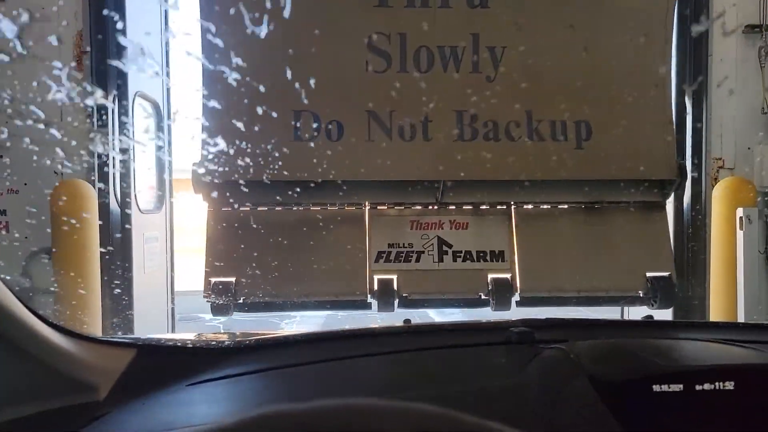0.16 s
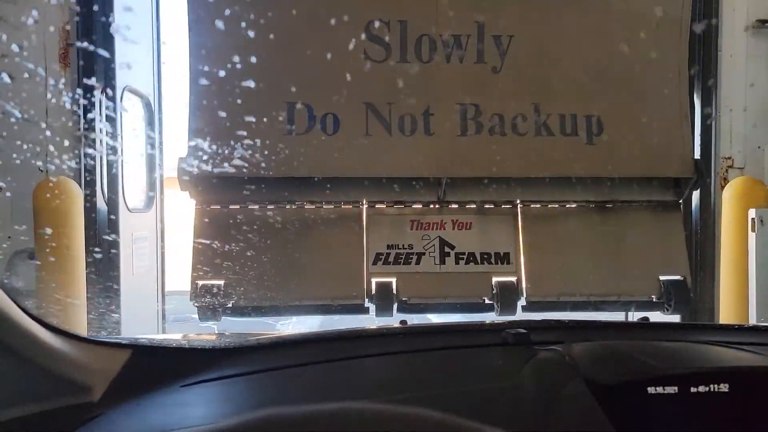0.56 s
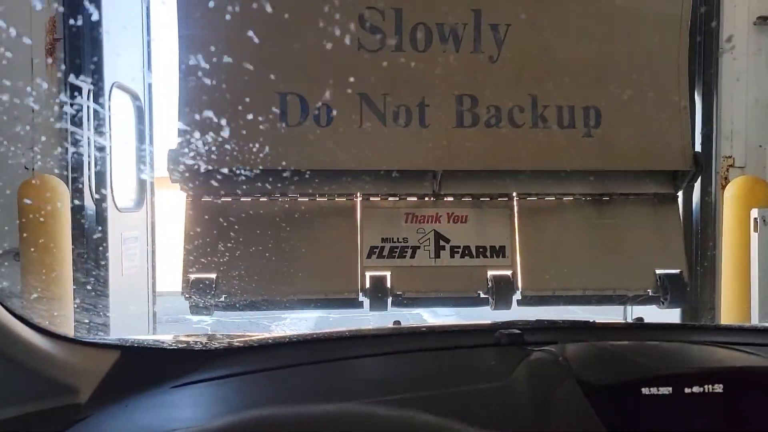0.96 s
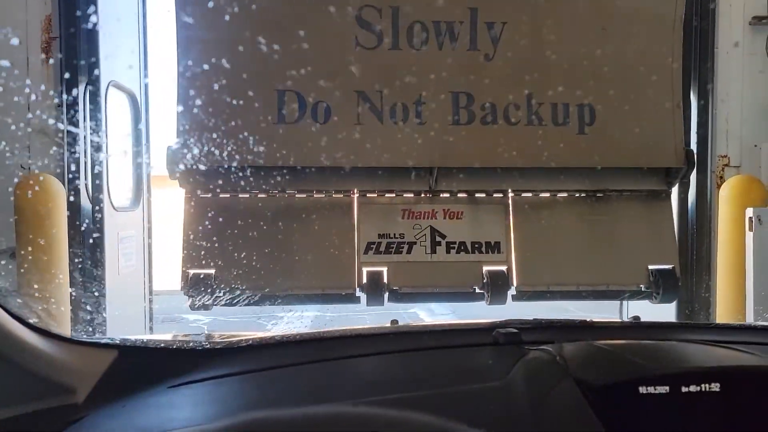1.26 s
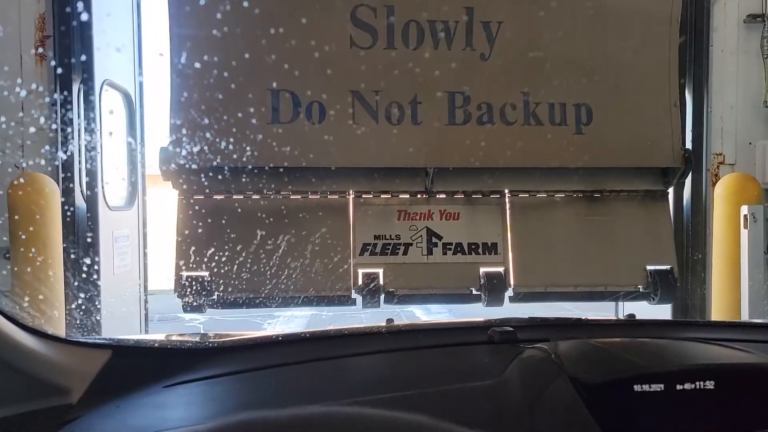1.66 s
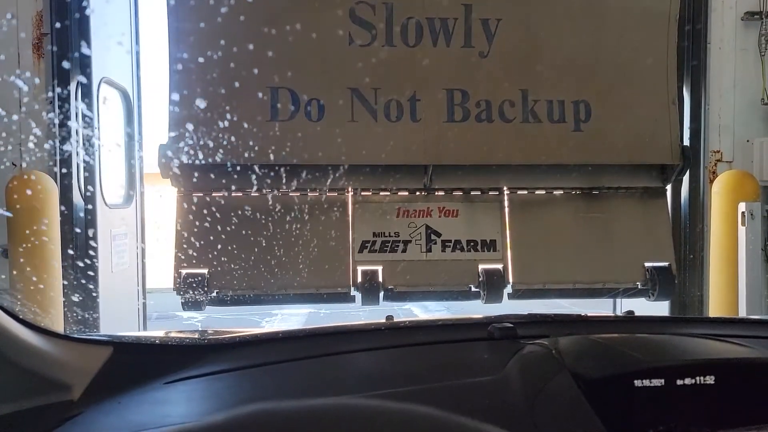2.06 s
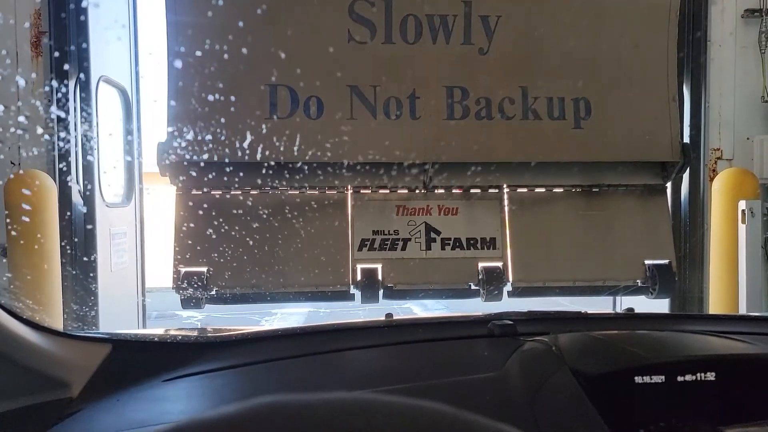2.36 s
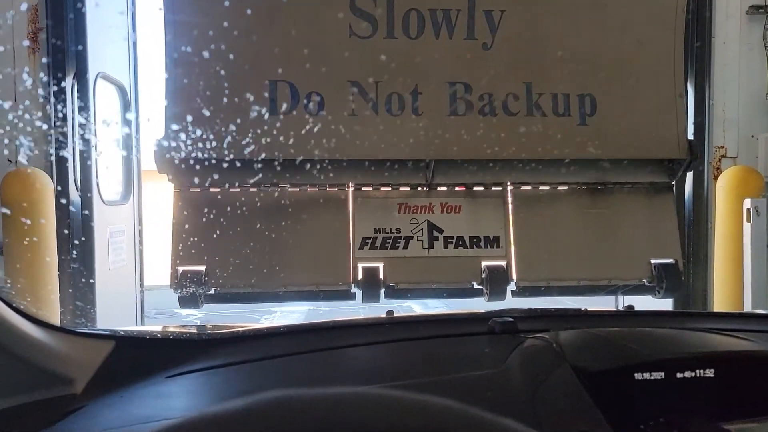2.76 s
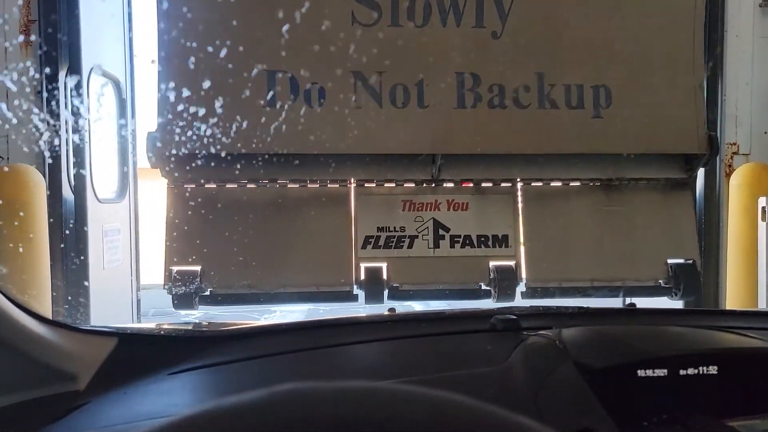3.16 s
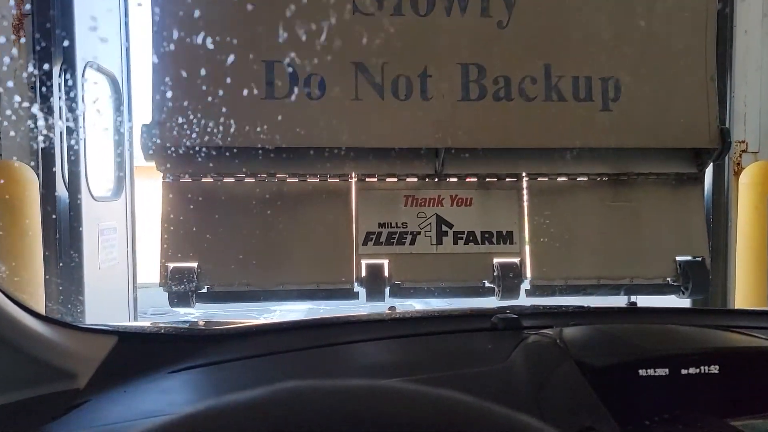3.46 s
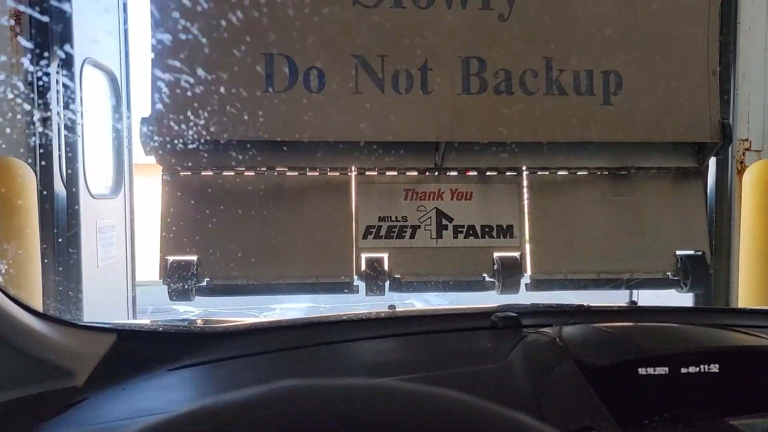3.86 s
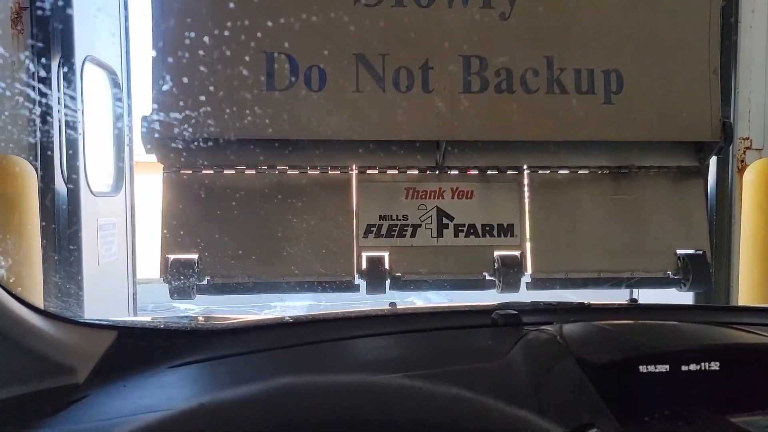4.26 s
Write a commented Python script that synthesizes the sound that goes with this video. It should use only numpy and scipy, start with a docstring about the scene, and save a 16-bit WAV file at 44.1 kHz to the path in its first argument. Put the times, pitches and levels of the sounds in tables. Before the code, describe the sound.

Inside a closed car under car wash dryer blowers, heavy low rumble fills the cabin from start to end, swelling and dipping rapidly as air buffets the roof and glass. A muffled roar flutters above it, with a faint fan hum coming and going. Soft hiss lies on top, and a few tiny ticks occur before one second. Close, enclosed stereo phone pickup.

```python
"""Air from the dryer blowers of a car wash buffets the roof and glass, heard inside the closed car.
Low noise in three groups of cabin and panel modes makes the boom; the body shell drones under it.
Fluttering bands of noise make the duller roar and hiss through body and seals. One fan hums as an
unsteady sine, a second as a narrow band of noise. A few bright ticks and a faint, flickering hiss
lie on top. All is heard by a phone with two microphone ports."""
import sys
import numpy as np
from scipy import signal
from scipy.fft import rfft, irfft
from scipy.io import wavfile
from scipy.ndimage import uniform_filter1d

SR = 44100
rng = np.random.default_rng(int(sys.argv[2]) if len(sys.argv) > 2 else 0)


def pcm_store(signal):
    """Save signal as 16-bit PCM."""
    levels = np.round(np.clip(np.atleast_2d(signal), -1, 1) * 32767)
    wavfile.write(sys.argv[1], SR, levels.astype(np.int16).T)


N = 194436
TIME = np.arange(N) / SR  # s
FREQ = np.maximum(np.fft.rfftfreq(N, 1 / SR), 1)  # Hz, kept above zero for logs and divisions

# level of the boom noise over time, before gusts: t/s, then level/dB of the lowest, middle and upper modes
BOOM_LEVELS = [(0.0, -19.5, -38, -32.5), (0.04, -25.5, -18.5, -24), (0.07, -21, -12.5, -18),
               (0.13, -19.5, -25.5, -33.5), (0.26, -25.5, -15, -15), (0.28, -39, -22.5, -29),
               (0.36, -23.5, -23, -17), (0.39, -19, -14.5, -24), (0.54, -16, -17.5, -19),
               (0.58, -14.5, -11.5, -25), (0.74, -14.5, -21, -24), (0.85, -28.5, -14, -19.5),
               (0.97, -24, -28, -31.5), (1.01, -17.5, -17.5, -16.5), (1.08, -30, -15.5, -30.5),
               (1.3, -28.5, -18, -22), (1.35, -12.5, -30, -27), (1.4, -11, -17, -19),
               (1.46, -24, -18.5, -24), (1.56, -24, -14, -22.5), (1.71, -24.5, -25, -21.5),
               (1.83, -15.5, -11, -22.5), (1.93, -38, -28, -22.5), (1.95, -42, -13, -41.5),
               (1.99, -26, -16, -11.5), (2.02, -21, -16, -21.5), (2.06, -44, -29, -21.5),
               (2.11, -22.5, -15.5, -23.5), (2.22, -17.5, -19.5, -20), (2.25, -16, -20.5, -25.5),
               (2.32, -28, -9.5, -23), (2.34, -23.5, -16, -29), (2.42, -17.5, -16, -21.5),
               (2.45, -22, -17, -25.5), (2.65, -19, -14, -21.5), (2.74, -26.5, -14.5, -19.5),
               (2.84, -15.5, -19, -25.5), (3.12, -22.5, -15.5, -18), (3.14, -26.5, -21.5, -20),
               (3.2, -22, -16, -25), (3.25, -10.5, -9.5, -18.5), (3.29, -14, -21, -27.5),
               (3.42, -18, -18, -19.5), (3.45, -26, -12.5, -28.5), (3.49, -15, -14.5, -19.5),
               (3.57, -23, -16.5, -21.5), (3.61, -9.5, -16.5, -36.5), (3.68, -21, -11, -18.5),
               (3.74, -28, -24.5, -36), (3.79, -20, -11.5, -19.5), (3.83, -18.5, -19.5, -27.5),
               (3.96, -20.5, -16, -19.5), (4.01, -26, -11.5, -32.5), (4.12, -21, -25, -22),
               (4.2, -20, -7.5, -18), (4.22, -17, -33, -25), (4.26, -25, -10, -28), (4.3, -33, -11, -24),
               (4.36, -10, -19.5, -24), (4.41, -24.5, -12.5, -26.5)]
# modes of cabin and panels, one list per level column above: f/Hz, width/Hz, level/dB
# (boom() squares each mode's gain, which doubles this relative level in dB and narrows the peak)
BOOM_MODES = [
    [(45.6, 3.8, -9.5), (56.7, 13, -7)],
    [(66.7, 7.1, -4), (85.1, 29, -0.5), (110.7, 18.8, -2)],
    [(143.7, 22, -0.5), (169.4, 14, -1)],
]
# the blast through body and seals: t/s, then level/dB of the low, middle and upper roar and the hiss
BLAST_LEVELS = [(0, -28.5, -24, -25.5, -51), (.3, -26.5, -25.5, -26, -51), (.85, -25.5, -24, -23.5, -49.5),
                (1.15, -26, -24.5, -26, -49.5), (1.6, -26.5, -23.5, -23, -49),
                (2.1, -24.5, -24, -23.5, -49.5), (2.6, -25.5, -24.5, -23.5, -50),
                (3.1, -24, -23.5, -22.5, -49.5), (3.6, -24, -24, -20, -48.5), (4, -24, -22, -24.5, -49),
                (4.41, -26.5, -23.5, -23.5, -49.5)]
# colour of the roar through the panels: f/Hz, relative level/dB per Hz
ROAR_COLOUR = [(100, -37.5), (170, -5), (200, -5), (267, -5.5), (312, -7), (347, -6), (412, -13.5),
               (486, -16), (540, -19), (655, -22), (742, -21), (858, -27.5), (1110, -29.5), (1250, -35.5),
               (1700, -43.5), (2210, -78.5), (3740, -120)]
# colour of the hiss through the seals: f/Hz, relative level/dB per Hz
HISS_COLOUR = [(900, -40), (1300, -4.5), (1630, -7), (2840, -7), (4940, -17.5), (5800, -26), (7100, -29),
               (7900, -35), (8500, -48), (10000, -68.5)]
# panel resonances raised above the roar: f/Hz, width/Hz, lift/dB
PANEL_MODES = [(381, 48, 2.5), (533, 18, 3.5), (570, 52, 4.5), (722, 15, 1.5), (764, 110, 2.5),
               (834, 55, 2), (1165, 290, 4)]
# gaps in the seals that colour the hiss: f/Hz, width/Hz, lift/dB
SEAL_GAPS = [(1350, 140, 4), (1790, 130, 3), (2650, 500, 0.5)]
# the blade tone comes and goes: t/s, level/dB before its roughness
HUM_LEVELS = [(0.0, -50), (0.08, -28), (0.16, -46), (0.21, -27), (0.38, -42), (0.44, -26), (0.54, -46.5),
              (0.78, -32.5), (0.81, -44), (0.85, -35.5), (1.19, -43.5), (1.37, -27.5), (1.42, -36),
              (1.48, -23.5), (1.52, -44), (1.63, -26), (1.93, -38), (2.17, -29), (2.2, -41), (3.06, -35),
              (3.08, -46.5), (3.34, -28), (4.12, -32.5), (4.16, -23.5), (4.25, -39.5), (4.41, -37)]
# faint bright ticks: t/s, peak level/dB
TICK_PEAKS = [(.512, -62), (.7412, -55), (.862, -65)]
# likeness of the noise at the two ports: f/Hz, correlation (-1 to 1)
PORT_LIKENESS = [(60, .995), (110, .98), (170, .96), (210, .8), (260, .35), (370, 0), (500, .25),
                 (650, .05), (850, -.75), (980, -.25), (1300, -.55), (1900, -.15), (3200, -.2), (5000, 0)]
# balance of the two ports: f/Hz, left minus right level/dB
PORT_BALANCE = [(50, -0.5), (90, 1), (120, 1.5), (175, 4.5), (215, -5), (280, 0.5), (345, -1.5), (560, -2),
                (750, 0.5), (1150, 1), (1700, -0.5), (2800, 2.5), (4500, -1.5), (6500, 4.5), (8500, -1.5)]
# colour of the capsule hiss: f/Hz, relative level/dB per Hz
CAPSULE_COLOUR = [(6000, -2), (8500, -6.5), (11300, -8), (12400, -4), (13300, -4), (13850, -5),
                  (14400, -4.5), (15300, -10), (15750, -5)]
# level of the capsule hiss before it flickers: t/s, level/dB
CAPSULE_LEVELS = [(0, -71.5), (.45, -72), (.65, -69.5), (1.1, -71), (1.6, -72), (3.3, -72), (3.6, -70.5),
                  (4.41, -72)]

BOOM_EVEN = 0.95  # how far the chance swelling of the modes is evened out (0-1)
GUST_PER_S, GUST_DB = 22, 0.78  # quick gusts that move the level of all low modes at once
ROAR_BANDS_HZ = (360, 720, 1020, 1450)  # where the low, middle, upper and again middle levels apply
ROAR_FLUTTER_DB, HISS_FLUTTER_DB, SHARED_FLUTTER_DB = 2.1, 1.3, 0.55
HUM_HZ, HUM_PAN_DB, HUM_LAG_RAD = 344.3, 1.5, 0.6  # pan and lag: left against right
PORT_HZ = (7.3, 27.2)  # bass corner of left and right port
RUMBLE_CUT_HZ, TOP_HZ = 27, 15735  # the phone's own bass cut and the top cut
CEILING = 1  # soft clipping nears this amplitude
CAPSULE_SHARED = 0.65  # amount of common noise added to each capsule's own


def boom():
    """Low noise in three groups of modes, each following its level curve."""
    out = 0
    gust_db = GUST_DB * walk(GUST_PER_S)
    for modes, level_db in zip(BOOM_MODES, over_time(BOOM_LEVELS)):
        # squared mode gains, added by power
        power = sum(np.abs(undb(db) * resonance(hz, width_hz)) ** 4 for hz, width_hz, db in modes)
        out = out + undb(level_db + gust_db) * at_ports(np.sqrt(power), BOOM_EVEN)
    return out


def shell_drone():
    """The body shell drones fairly evenly under the blast: noise in one low resonance."""
    return ringing(hz=36, width_hz=17, db=-29, even=0.4)


def blast():
    """Roar through the panels and hiss through the seals, in half-octave bands that flutter a little."""
    low_db, middle_db, upper_db, hiss_db = over_time(BLAST_LEVELS)
    roar = rfft(at_ports(lifted(ROAR_COLOUR, PANEL_MODES)))
    hiss = rfft(at_ports(lifted(HISS_COLOUR, SEAL_GAPS)))
    shared_db = SHARED_FLUTTER_DB * flutter(40)
    out = 0
    for octave in np.arange(7, 13.6, 0.5):  # log2 of the band centre in Hz
        share = np.clip(1 - 2 * np.abs(np.log2(FREQ) - octave), 0, 1)  # bands crossfade
        weights = [np.interp(octave, np.log2(ROAR_BANDS_HZ), row) for row in np.eye(4)]
        roar_db = np.dot(weights, [low_db, middle_db, upper_db, middle_db])
        roar_gain = undb(roar_db + shared_db + ROAR_FLUTTER_DB * flutter(50))
        hiss_gain = undb(hiss_db + shared_db + HISS_FLUTTER_DB * flutter(70))
        out = out + roar_gain * irfft(roar * share, N)
        out = out + hiss_gain * irfft(hiss * share, N)
    return out


def hum():
    """Blade tone of a fan, wavering in pitch and strength; it reaches the ports out of step."""
    side = np.array([[0.5], [-0.5]])  # left, right
    phase = 2 * np.pi * HUM_HZ * TIME + 1.1 * walk(12) + side * HUM_LAG_RAD
    rough_db = 2.5 * walk(25)
    level_db = over_time(HUM_LEVELS)[0] + rough_db + side * HUM_PAN_DB
    return np.sqrt(2) * undb(level_db) * np.sin(phase)  # root 2: the level is rms


def second_fan():
    """A second fan, slightly higher, heard as a narrow band of noise near 352 Hz."""
    return ringing(hz=352, width_hz=6.6, db=-41.5)


def ticks():
    """Bright ticks, each a short windowed burst of a high sine."""
    pulses = np.zeros(N)
    for s, db in TICK_PEAKS:
        pulses[int(s * SR)] = undb(db)
    tick = np.sin(2 * np.pi * 13500 * TIME[:60]) * np.hanning(60)  # 13.5 kHz, 60 samples
    return np.convolve(pulses, tick)[:N]


def capsule_hiss():
    """Self-noise of the two capsules, partly alike, its level flickering quickly."""
    shared, own = rng.standard_normal(N), rng.standard_normal((2, N))
    colour = undb(over_hz(CAPSULE_COLOUR)) * (FREQ > 6000)
    hiss = unit(irfft(rfft(own + CAPSULE_SHARED * shared) * colour, N))
    flicker_db = 0.8 * flutter(45) + 1.3 * flutter(120)
    return hiss * undb(over_time(CAPSULE_LEVELS)[0] + flicker_db)


def at_ports(gain, even=0.):
    """Noise of a given colour at both ports, alike and balanced as the cabin's field makes it; mid rms 1."""
    like = np.clip(over_hz(PORT_LIKENESS), -1, 1)
    pan = undb(over_hz(PORT_BALANCE) / 2)
    mid, side = (rfft(rng.standard_normal(N)) * gain for _ in range(2))
    mid, side = mid * np.sqrt(1 + like), side * np.sqrt(1 - like)
    pair = irfft([(mid + side) * pan, (mid - side) / pan], N)
    swell = uniform_filter1d(np.abs(signal.hilbert(pair.mean(0))), SR // 25)  # 40 ms envelope
    pair = pair / swell ** np.clip(even, 0, 1)
    return pair / np.sqrt(np.mean(pair.mean(0) ** 2))


def ringing(hz, width_hz, db, even=0.):
    """Noise in one steep resonance: a damped mode's gain squared."""
    return undb(db) * at_ports(np.abs(resonance(hz, width_hz)) ** 2, even)


def resonance(hz, width_hz):
    """Gain of a damped mode, 1 at its centre."""
    return 1 / (1 + 1j * (FREQ ** 2 - hz ** 2) / (FREQ * width_hz))


def lifted(colour, peaks):
    """A spectrum with resonances raised above it."""
    lift = sum((undb(db) - 1) * np.abs(resonance(hz, width_hz)) ** 2 for hz, width_hz, db in peaks)
    return undb(over_hz(colour)) * (1 + lift)


def walk(rate):
    """Random levels held 1 / rate s and slewed twice; spread near 1."""
    hold = int(SR / rate)
    steps = np.repeat(rng.standard_normal(N // hold + 1), hold)
    return 1.08 * uniform_filter1d(uniform_filter1d(steps, hold), hold)[:N]


def flutter(rate):
    """Quick wavering without slow swells."""
    quick = walk(rate)
    return quick - uniform_filter1d(quick, SR // 8)


def over_hz(table):
    """A (Hz, value) table read at every frequency, along a log axis."""
    hz, value = np.transpose(table)
    return np.interp(np.log(FREQ), np.log(hz), value)


def over_time(table):
    """Each column of a curve read at every sample."""
    s, *columns = np.transpose(table)
    return [np.interp(TIME, s, column) for column in columns]


def undb(db):
    """Decibels to amplitude."""
    return 10 ** (np.asarray(db) / 20)


def unit(x):
    """Signal scaled to rms 1."""
    return x / np.sqrt(np.mean(x ** 2))


def scene():
    """Boom and drone, the blast, both fans, and the ticks, summed at the two ports."""
    return boom() + shell_drone() + blast() + hum() + second_fan() + ticks()


def record(dry):
    """Each port rolls off the deep bass at its own corner; soft clipping, capsule hiss, top cut."""
    port_cut = 1 + np.array(PORT_HZ)[:, None] / (1j * FREQ)
    rumble_cut = np.sqrt(1 + (RUMBLE_CUT_HZ / FREQ) ** 6)
    ports = irfft(rfft(dry) / port_cut / rumble_cut, N)
    rounded = ports / (1 + (ports / CEILING) ** 4) ** (1 / 4)
    top_cut = signal.ellip(14, 0.3, 60, TOP_HZ, fs=SR, output="sos")
    return signal.sosfilt(top_cut, rounded + capsule_hiss())


dry = scene()
out = record(dry)
pcm_store(out)
```